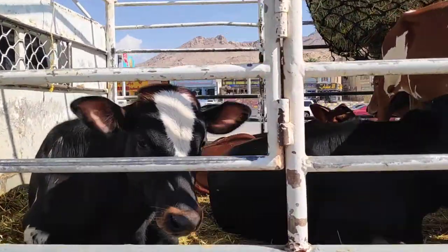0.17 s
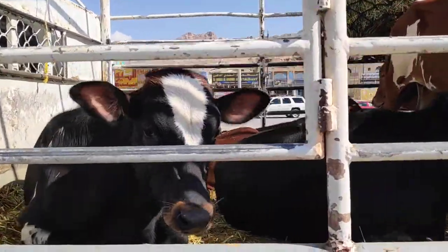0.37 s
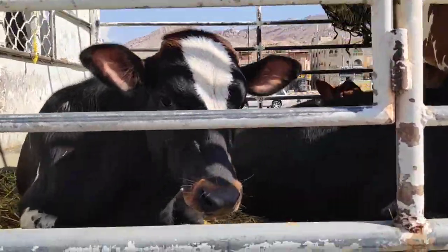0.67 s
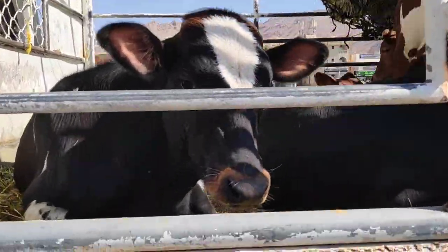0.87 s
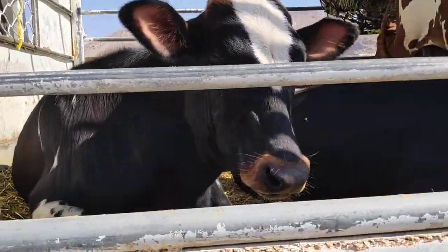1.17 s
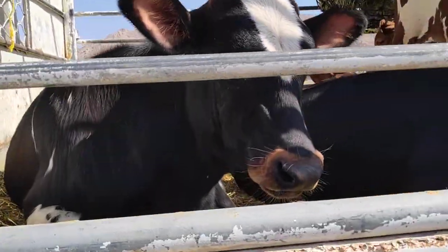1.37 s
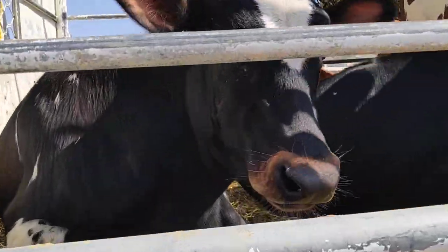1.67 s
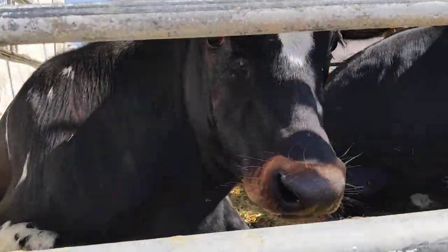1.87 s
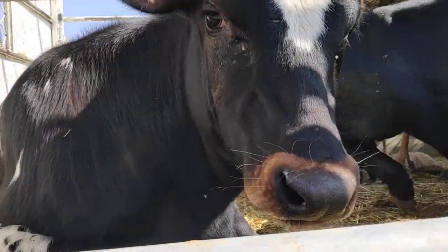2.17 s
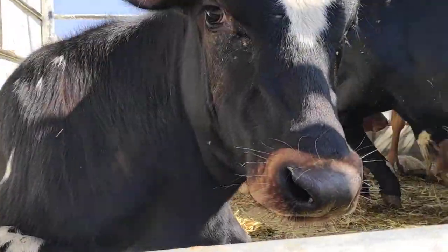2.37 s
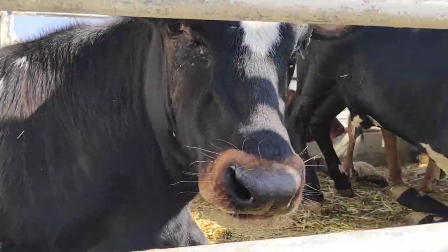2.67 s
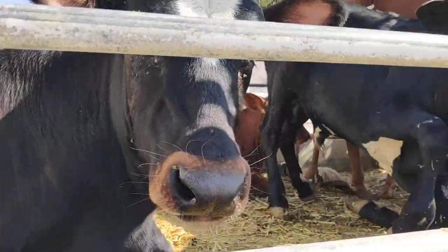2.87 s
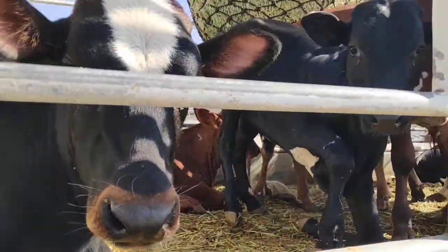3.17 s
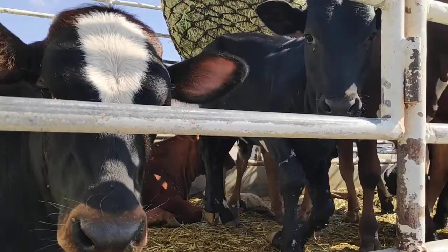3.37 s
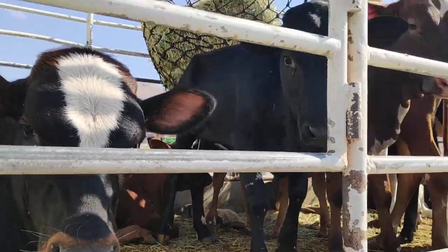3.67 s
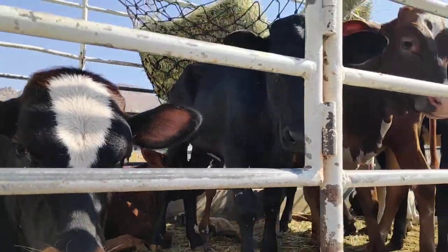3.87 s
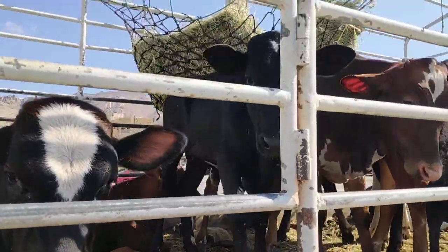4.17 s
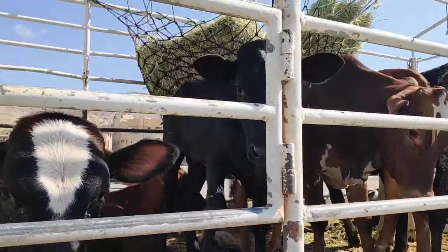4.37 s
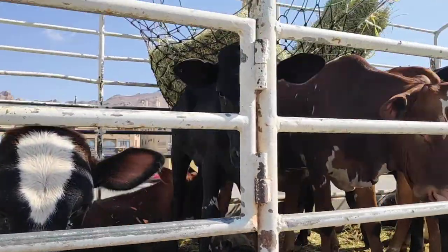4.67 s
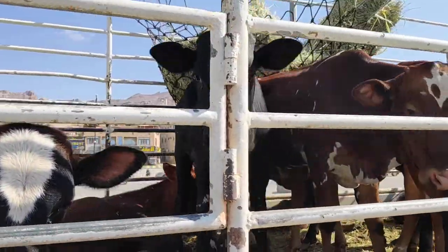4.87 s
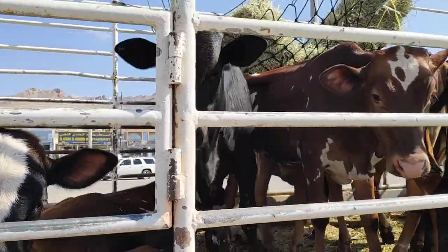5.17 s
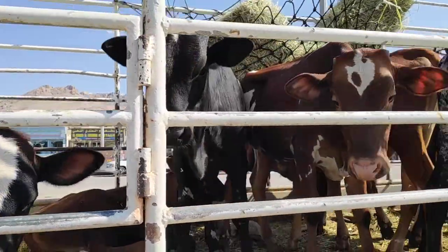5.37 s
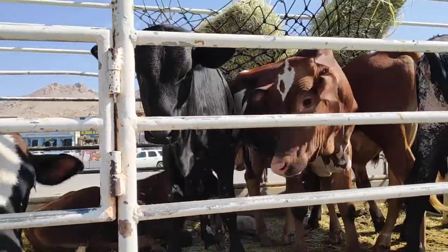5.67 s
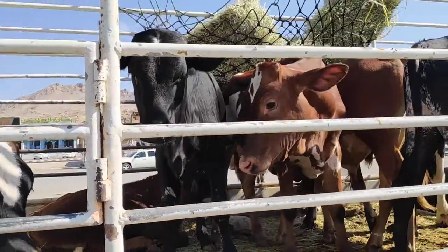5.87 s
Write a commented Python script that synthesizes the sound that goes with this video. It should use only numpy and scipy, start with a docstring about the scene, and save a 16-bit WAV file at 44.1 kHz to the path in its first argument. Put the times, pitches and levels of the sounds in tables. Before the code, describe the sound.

A faint low rumble and hum of an open-air livestock yard runs throughout. Soft hollow knocks come at about 0.5 and 1.1 seconds, with a slight swell of bustle and very faint, thin, wavering high tones between them. At 1 second a nearby calf starts a nasal hum that opens into a loud, slightly hoarse bawl, holding a fairly steady pitch before dropping and ending around 2.6 seconds. From 2.7 to 3.5 seconds, faint, dull, distant knocks sound at a mostly even pace, about five a second. At 3.4 seconds a farther calf begins with a breathy rasp, then gives a quieter, slightly echoing bawl that breaks upward near 3.9 seconds, falls back near 4.9 and ends at 5.2. Right then the near calf bawls loudly again, rising a little in pitch and still calling at the end, around 6 seconds.

```python
"""Two calves bawl at an open-air livestock market: a near one twice, a farther one in between.
Each call follows the source-filter principle: vocal-fold pulses excite a throat whose resonances
change as the mouth opens, and walls reflect the sound. Behind them the yard rumbles and hums, and
something hollow knocks, at times at an even pace. Faint, thin, wavering high tones come and go."""
import sys
import numpy as np
from scipy import signal
from scipy.fft import rfft, irfft, next_fast_len
from scipy.io import wavfile
from scipy.ndimage import uniform_filter1d, map_coordinates

SR = 44100
rng = np.random.default_rng(int(sys.argv[2]) if len(sys.argv) > 2 else 0)


def wrap_up_sound(samples):
    """Save the sound to the file named by the first command line argument, as 16-bit audio."""
    columns = np.atleast_2d(samples).T
    # keep every value between -1 and 1, then stretch to whole-number steps
    tamed = np.clip(columns, -1, 1)
    steps = np.round(tamed * 32767).astype(np.int16)
    wavfile.write(sys.argv[1], SR, steps)


N = 264908


def amp(db):
    return 10 ** (np.asarray(db) / 20)

def unit(x):
    return x / np.sqrt(np.mean(x ** 2) + 1e-20)

def along(points, hz):
    """Interpolation of (Hz, value) points on a log frequency axis."""
    f, v = np.transpose(points)
    return np.interp(np.log(hz + 1), np.log(f + 1), v)

def curves(rows):
    """Linear interpolation in time of each column after the first."""
    s, *cols = np.transpose(rows)
    return [np.interp(np.arange(N) / SR, s, c) for c in cols]

def gate(rows, fade):
    """Trapezoidal window: 1 from the first row's time to the last's."""
    start, end = rows[0][0], rows[-1][0]
    return curves([(start - fade, 0), (start, 1), (end, 1), (end + fade, 0)])[0]

def wobble(rate):
    """Smooth random modulation, rate knots a second."""
    return map_coordinates(rng.standard_normal(int(N * rate / SR) + 4), [np.arange(N) * rate / SR])

def tone(hz):
    """A sinusoid whose phase is the integral of frequency."""
    return np.cos(2 * np.pi * np.cumsum(hz) / SR)

def filtered(x, response):
    """Filtering by multiplication of the spectrum."""
    m = next_fast_len(N + SR // 2)
    return irfft(rfft(x, m) * response(np.fft.rfftfreq(m, 1 / SR)), m)[:N]

def rush(spectrum, patchy_db):
    """Coloured noise of rms 1, modulated in random patches of time and frequency."""
    z = signal.stft(rng.standard_normal(N), nperseg=1024)[2]
    patches = uniform_filter1d(rng.standard_normal(z.shape), size=4, axis=0)
    patches = unit(uniform_filter1d(patches, size=5, axis=1))
    noise = signal.istft(z * amp(patchy_db * patches), nperseg=1024)[1][:N]
    return unit(filtered(noise, lambda hz: amp(along(spectrum, hz))))


# Course of the yard noise. Each row: time in seconds, rumble level in dB, bustle level in dB.
YARD_LEVELS = [(0, -59, -67), (.74, -59.5, -66), (.92, -54.5, -52), (1.05, -54, -62), (2.8, -55, -68.5),
               (2.95, -62.5, -69.5)]
# Noise spectra. Each row: frequency in Hz, relative density in dB.
RUMBLE_SPECTRUM = [(53, -42), (110, -15), (188, -5), (236, -17.5), (264, -4), (450, -29), (990, -120)]
BUSTLE_SPECTRUM = [(240, -43.5), (400, -9), (588, -6.5), (915, -5), (1280, -16), (1430, -34), (1900, -43),
                   (2470, -79.5)]
HUM_HZ, HUM_DB = 271, -60

def yard(calls):
    """Broadband rumble and bustle with a tonal hum; a suppressor lowers the rumble during calls."""
    rumble_db, bustle_db = curves(YARD_LEVELS)
    rumble = rush(RUMBLE_SPECTRUM, patchy_db=-.5)
    bustle = rush(BUSTLE_SPECTRUM, patchy_db=6)
    hum = amp(HUM_DB) * (1 + .058 * wobble(9.1)) * tone(HUM_HZ + 2.43 * wobble(6))
    loudness = uniform_filter1d(np.abs(calls), size=SR // 5)
    duck_db = -5 * loudness / (loudness + amp(-40))
    rumble *= amp(rumble_db + duck_db + 1.5 * wobble(6.2))
    bustle *= amp(bustle_db + 2.5 * wobble(6.5))
    return rumble + bustle + hum


# Runs of knocks. Each row: start in seconds, number of blows, relative level in dB.
KNOCK_RUNS = [(.477, 1, -57), (1.078, 1, -47.5), (2.704, 5, -48.5), (3.214, 2, -52.5), (3.468, 1, -53.5)]
# Modes of the struck body. Each row: frequency in Hz, relative level in dB, 60 dB decay time in seconds.
HOLLOW_MODES = [(824, -1.5, 0.08), (868, 14, 0.029)]
PACE_S = .2038

def knocks():
    """Damped free vibration: dull, distant blows excite the modes of something hollow."""
    out, t = np.zeros(N + SR), np.arange(SR // 4) / SR
    attack = (1 - np.exp(-t / .0013)) ** 2
    for start, blows, db in KNOCK_RUNS:
        for k in range(round(blows)):
            ring = sum(amp(level + rng.normal(0, 1.6) - 60 * t / t60) * np.sin(2 * np.pi * hz * t)
                       for hz, level, t60 in HOLLOW_MODES)
            out[round((start + k * PACE_S) * SR):][:len(t)] += amp(db - 7) * attack * ring
    return out[:N]


# Decay of the reflections. Each row: frequency in Hz, reverberation time in seconds.
REVERB_TIMES = [(200, 0.99), (700, 0.43), (1500, 0.29), (5000, 0.099)]

def walls(x, tail_db, wait_s):
    """Reverberation: a diffuse tail follows the direct sound and dies faster in the treble."""
    hz, t, z = signal.stft(rng.standard_normal(SR // 2), SR, nperseg=256)
    tail = signal.istft(z * amp(-60 * t / along(REVERB_TIMES, hz)[:, None]), SR, nperseg=256)[1]
    response = amp(tail_db) * np.pad(tail / np.linalg.norm(tail), (round(wait_s * SR), 0))
    return x + signal.fftconvolve(x, response)[:N]


# Faint high tones. Each row: start and end in seconds, first and last frequency in Hz, level in dB.
THIN_TONE_GLIDES = [(.67, .97, 3720, 3620, -79), (.768, .98, 4700, 4200, -78), (.768, 1.1, 4050, 4050, -83),
                    (.872, .97, 2390, 2370, -79), (1.012, 1.045, 3320, 3290, -80)]

def thin_tones():
    """Random amplitude modulation makes thin tones waver; each starts sharply and trails off."""
    out = np.zeros(N)
    for start, end, from_hz, to_hz, db in THIN_TONE_GLIDES:
        hz, envelope = curves([(start - .003, from_hz, 0), (start, from_hz, 1),
                               (end, to_hz, .5), (end + .04, to_hz, 0)])
        out += envelope * amp(db) * (.7 + wobble(300)) * tone(hz)
    return out


def throat_response(shape, treble):
    """Minimum-phase filter from a folded cepstrum: log gain (real), phase (imaginary), every 10 Hz."""
    points = list(shape) + [(hz, db + shape[-1][1]) for hz, db in treble]
    hz = np.arange(SR // 20 + 1) * 10.
    cepstrum = irfft(np.log(amp(np.maximum(along(points, hz), -110))))
    cepstrum[1:len(hz) - 1] *= 2
    cepstrum[len(hz):] = 0
    return rfft(cepstrum)


UNSTEADY_HZ_PER_S = 120  # a glide this fast doubles the hoarseness
DULL_DB = .37  # treble loss for each Hz per second that the pitch sinks

def bawl(rows, pitch_hz, throats, treble, jitter, hoarse, scatter_db, soft, follows):
    """Source-filter model: the changing throat weights and delays each harmonic of the fold pulses."""
    level_db, place = curves(rows)[:2]
    on = gate(rows, fade=.012)
    span = np.flatnonzero(on)
    knots = np.arange(0, len(span), 128)  # the filter is evaluated at these samples
    at = span[knots]
    slope = np.gradient(pitch_hz) * SR
    glide = uniform_filter1d(np.abs(slope), size=SR // 30)
    sink = uniform_filter1d(np.maximum(-slope, 0), size=SR // 30)
    pitch_hz = pitch_hz * (1 + jitter * (wobble(12) + wobble(130)))
    phase = 2 * np.pi * np.cumsum(pitch_hz[span]) / SR
    order = np.arange(1, 63)[:, None]
    hz = order * pitch_hz[at]

    # The larynx rises with the pitch and carries the resonances along.
    shapes = np.array([throat_response(shape, treble) for shape in throats])
    place = np.clip(place[at], 0, len(throats) - 1)
    home_hz = np.interp(place, np.arange(len(throats)), [shape[0][0] for shape in throats])
    where = np.broadcast_arrays(place, hz / 10 * (home_hz / pitch_hz[at]) ** follows)
    # Short waves take many paths round bodies and rails; interference makes single overtones drop out.
    drift = map_coordinates(rng.standard_normal((200, 40)),
                            np.broadcast_arrays(order / 1.2, knots * 5 / SR))
    fading_db = scatter_db * np.clip(hz / 2000 - .6, 0, 3) * np.clip(drift, -2.5, .8)
    # Folds close gently in softer calling and as they slacken: less treble.
    effort_db = soft * np.clip(hz / 3500, 0, 1.4) ** 4 * (level_db[at] - level_db[span].max())
    effort_db -= DULL_DB * sink[at] * np.clip(hz / 500 - 10, 0, 1)
    gain = np.exp(map_coordinates(shapes.real, where, order=1)) * amp(fading_db + effort_db)
    gain /= np.sqrt(np.sum(gain ** 2, axis=0) / 2)
    shift = map_coordinates(shapes.imag, where, order=1)
    shift += np.pi * (order > 12) * rng.uniform(-1.1, 1, order.shape)

    # Uneven closure scatters the pulse sizes, more so when the tension changes fast.
    rough = hoarse * (1 + np.clip(glide[span] / UNSTEADY_HZ_PER_S, 0, 3))
    voice, shimmer = np.zeros(N), wobble(200)[span]
    per_sample = lambda v: np.interp(np.arange(len(span)), knots, v)
    for k, weight, offset in zip(order[:, 0], gain, shift):
        turbulence = np.interp(span * 170 / SR, np.arange(1200), rng.standard_normal(1200))
        turbulence *= .22 * max(k - 6, 0)  # roughens each upper overtone separately
        harmonic = per_sample(weight) * np.cos(k * phase + per_sample(offset))
        voice[span] -= harmonic * (1 + rough * (shimmer + turbulence))
    return on * amp(level_db) * voice


NOSE_HZ, NOSE_HZ_PER_S = 126.7, 98  # nasal hum: pitch as the mouth opens, rate of climb
SETTLE_S, FALL_HZ_PER_S, BEND_S = .06, 264, .052

def near_pitch(opens, crest, crest_hz, arch, flat_hz, gives_out):
    """The fundamental starts flat, follows a parabolic arch and drops when the breath gives out."""
    t = np.arange(N) / SR
    open_s = np.clip(t - opens, -1, 2)
    hz = crest_hz - arch * (opens + open_s - crest) ** 2 - flat_hz * np.exp(-open_s / SETTLE_S)
    hz -= FALL_HZ_PER_S * BEND_S * np.logaddexp(0, (t - gives_out) / BEND_S)
    return np.where(open_s < 0, np.maximum(hz, NOSE_HZ + NOSE_HZ_PER_S * open_s), hz)


# Near calls. Each row: time in seconds, level in dB, place among the throat shapes (0 is mouth shut).
FIRST_CALL = [(1, -58, -1.5), (1.18, -49.5, 0.13), (1.215, -42, 1), (1.26, -34.5, 1.5), (1.31, -33, 2.5),
              (1.62, -28.5, 3), (1.85, -30, 4), (2.27, -30.5, 4), (2.39, -28, 5), (2.54, -34.5, 6),
              (2.6, -44, 7), (2.65, -58.5, 6)]
SECOND_CALL = [(5.19, -49.5, 0.27), (5.235, -40.5, 0.93), (5.35, -30.5, 1.12), (5.47, -32.5, 0.99),
               (5.62, -31.5, 1.395), (5.86, -28, 1.81), (6.01, -28.5, 1.71)]
# Pitch arches. Each holds: mouth opening and crest in seconds, crest pitch in Hz, curvature in Hz per
# second squared, initial flatness in Hz, end of breath in seconds.
FIRST_ARCH = (1.21, 1.89, 149.6, 30, 4.79, 2.421)
SECOND_ARCH = (5.19, 5.99, 144, 35, 25, 6.6)
# Throat shapes, each beginning at its own pitch. Each row of a shape: frequency in Hz, gain in dB.
NASAL_SHAPE = [(100, -19.5), (230, 14.5), (400, -34.5), (850, -6.5), (1500, -37.5), (2200, -56),
               (4300, -85.5)]
FIRST_SHAPES = [
    [(135, -23), (270, 0.5), (550, -32.5), (830, 7), (1100, -15), (1520, 8), (2250, -48), (2750, -34),
     (3050, -45), (3400, -24.5), (4280, -33)],
    [(138, -28), (276, 3), (552, -33.5), (828, 2.5), (1105, -11), (1519, 0.5), (1795, -5), (1933, -35),
     (2209, -14.5), (2500, -26.5), (2762, -17), (3050, -32), (3314, -20), (4280, -35.5)],
    [(147, -21), (440, -4), (587, -25), (880, 1), (1027, -18), (1467, -0.5), (1613, -30.5), (1760, -8),
     (2053, -39), (2347, -20), (3080, -35.5), (3667, -29.5), (4254, -41.5)],
    [(148, -19), (445, 0.5), (593, -17.5), (890, 3), (1186, -31), (1483, -2), (1631, -15), (1928, -12.5),
     (2076, -41), (2225, -27), (3114, -36.5), (4301, -40.5)],
    [(138, -33.5), (414, -6), (552, -47.5), (690, -16.5), (828, 2.5), (966, -33), (1242, -14.5),
     (1450, -11.5), (1794, -16.5), (2070, -35), (4280, -48.5)],
    [(116, -26), (579, -6), (694, 4.5), (1041, -22.5), (1230, -26.5), (1470, -5.5), (1736, -19),
     (4281, -47.5)],
]
SECOND_SHAPES = [
    [(130, -29.5), (389, 0.5), (519, -20), (778, -10.5), (908, 2.5), (1037, -18), (1400, -16),
     (1700, -13.5), (1945, -27.5), (2853, -21), (3242, -27.5), (3550, -32), (3950, -26), (4280, -38)],
    [(143, -25), (430, -6.5), (717, -26), (861, 2.5), (1004, -29), (1291, -22), (1435, 1), (2152, -26.5),
     (3157, -36), (4017, -43.5), (4304, -53)],
]
# Upper resonances. Each row: frequency in Hz, gain in dB relative to a shape's last point.
FIRST_HIGHS = [(4550, -8), (4850, -15), (7100, -23), (7800, -19), (8500, -25.5), (9200, -63.5)]
SECOND_HIGHS = [(4700, -6), (5100, -21), (6000, -12.5), (6800, -15.5), (7300, -21), (8600, -54)]

def near_calf():
    """Formant transition: twice a nasal hum opens into a full bawl."""
    first = bawl(FIRST_CALL, near_pitch(*FIRST_ARCH), [NASAL_SHAPE] + FIRST_SHAPES, FIRST_HIGHS,
                 jitter=.00094, hoarse=.05, scatter_db=5.5, soft=.11, follows=.081)
    second = bawl(SECOND_CALL, near_pitch(*SECOND_ARCH), [NASAL_SHAPE] + SECOND_SHAPES, SECOND_HIGHS,
                  jitter=.00067, hoarse=.05, scatter_db=5, soft=.06, follows=.18)
    return first + second


# Onset of the far call. Each row: time in seconds, resonance in Hz, level in dB.
RASP_COURSE = [(3.38, 2700, -83), (3.42, 2540, -68), (3.48, 2230, -60), (3.62, 2260, -63)]

def rasp():
    """Noise-excited resonance: air pulses through the half-closed throat before the folds lock in."""
    centre_hz, level_db = curves(RASP_COURSE)
    pulses = 1 + .17 * tone(135 * (1 + .025 * wobble(60)))
    effort = amp(2 * (level_db - level_db.max()))
    ring = lambda hz, width_hz: (.45 + wobble(width_hz)) * tone(hz)
    centre = ring(centre_hz, 500)
    neighbours = amp(-10.5) * ring(centre_hz + 850, 400) + amp(-13.5) * ring(centre_hz - 650, 500)
    return gate(RASP_COURSE, fade=.013) * amp(level_db) * unit(pulses * (centre + effort * neighbours))


# Far call, breaking upward near 3.9 s and back near 4.9 s.
# Each row: time in seconds, level in dB, place among the throat shapes, pitch in Hz.
FAR_CALL = [(3.612, -54, 0.17, 144.1), (3.645, -47, 0.088, 150.3), (3.85, -42, 0.25, 160.2),
            (3.89, -44.5, 0.11, 162.1), (3.915, -44, 0.79, 174), (3.98, -42, 0.87, 175.9),
            (4.09, -40.5, 0.98, 182.3), (4.15, -41, 1.05, 180.9), (4.4, -41.5, 1, 179),
            (4.43, -41, 1.05, 181.6), (4.88, -42, 1.26, 175.3), (4.91, -45.5, 1.5, 164.4),
            (5.05, -47.5, 2.56, 158.8), (5.21, -43, 2.4, 145.7)]
# Its throat shapes and upper resonances. Each row: frequency in Hz, relative gain in dB.
FAR_SHAPES = [
    [(156, -26.5), (312, -6), (468, -37.5), (937, -2.5), (1249, -24), (1405, -0.5), (1873, -17),
     (2810, -13.5), (3278, -27), (3590, -18.5), (3900, -36.5), (4215, -25)],
    [(181, -31), (362, -16), (723, -15.5), (904, -3.5), (1085, -17.5), (1627, -7.5), (1808, -25.5),
     (2350, -18.5), (2531, -41), (2711, -18.5), (3073, -38.5), (3254, -23), (3434, -46.5), (3615, -33),
     (4338, -39)],
    [(161, -17.5), (480, -9.5), (740, -22), (910, 2.5), (1291, -23.5), (1500, -7), (1630, 0), (1775, -15.5),
     (2744, -16), (3067, -29), (3389, -21), (3551, -49.5), (4196, -68)],
    [(153, -26.5), (460, -7.5), (765, -19), (918, 0.5), (1224, -36.5), (1450, -14.5), (2140, -18.5),
     (4200, -56.5)],
]
FAR_HIGHS = [(4750, -20), (5250, -6), (5900, -23.5), (6500, -21.5), (7000, -55.5)]

def far_calf():
    """Radiation from a small source: the mouth gives out a rasp, then a bawl weak in its lowest tone."""
    voice = bawl(FAR_CALL, curves(FAR_CALL)[2], FAR_SHAPES, FAR_HIGHS,
                 jitter=.0013, hoarse=.06, scatter_db=2.5, soft=.4, follows=.55)
    return filtered(voice + rasp(), lambda hz: np.clip(hz / 330, 0, 1) ** 2)


def scene():
    """Superposition of the sources; the distant ones carry a larger share of reverberation."""
    near, far = near_calf(), far_calf()
    calls = walls(near, tail_db=-20, wait_s=.02) + walls(far, tail_db=-11.5, wait_s=.015)
    blows = walls(knocks(), tail_db=-2.5, wait_s=.0068)
    return (calls + blows + thin_tones() + yard(calls))[None]


# Colour of the hiss. Each row: frequency in Hz, gain in dB.
HISS_SPECTRUM = [(2500, 7.5), (5000, -3)]
HISS_DB, TOP_HZ = -90.5, 15500

def record(dry):
    """Additive noise and band limiting: faint electronic hiss joins, and the highest treble is cut."""
    hiss = amp(HISS_DB) * filtered(rng.standard_normal(N), lambda hz: amp(along(HISS_SPECTRUM, hz)))
    return filtered(dry[0] + hiss, lambda hz: hz < TOP_HZ)[None]


dry = scene()
out = record(dry)
wrap_up_sound(out)
```